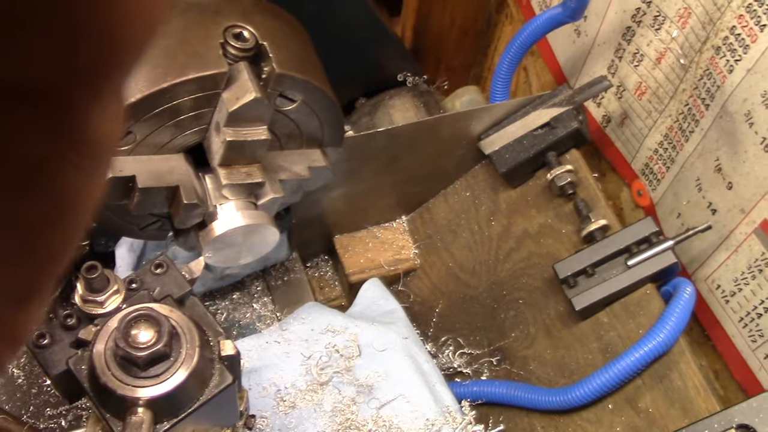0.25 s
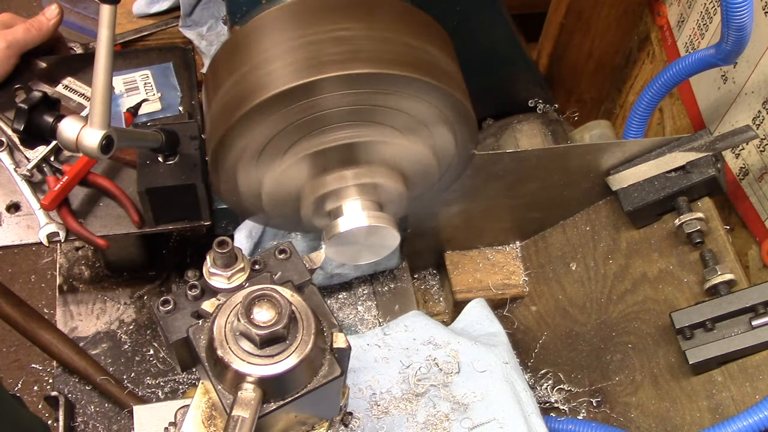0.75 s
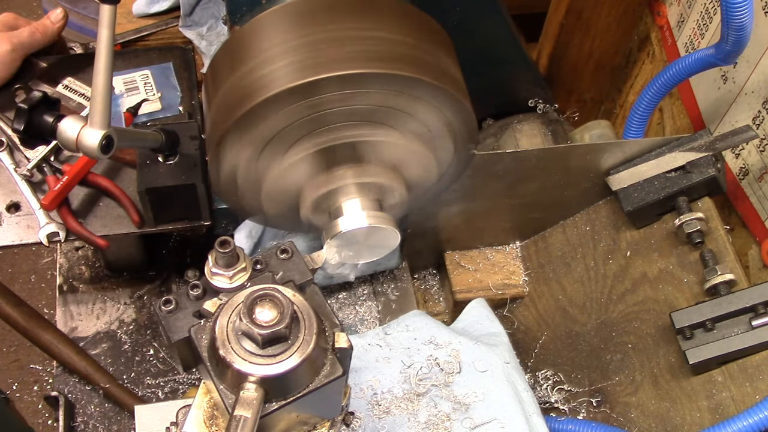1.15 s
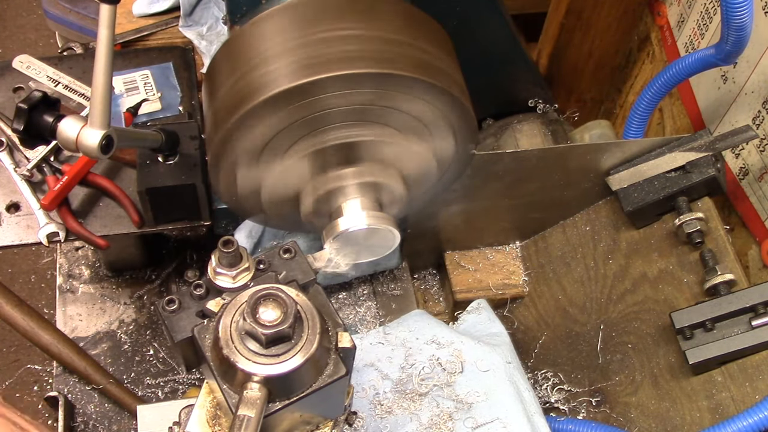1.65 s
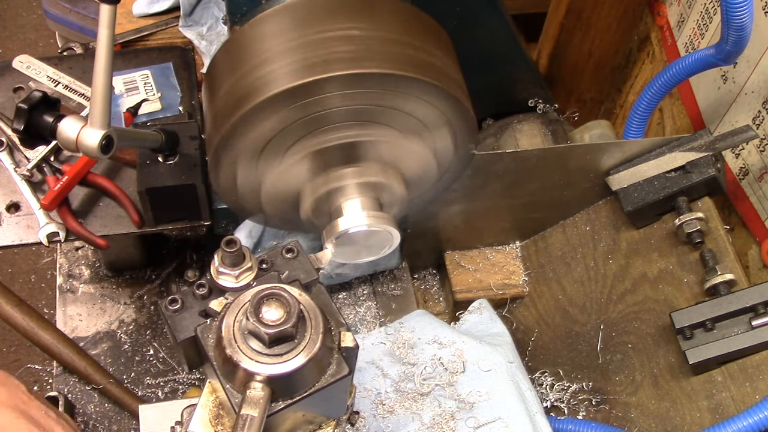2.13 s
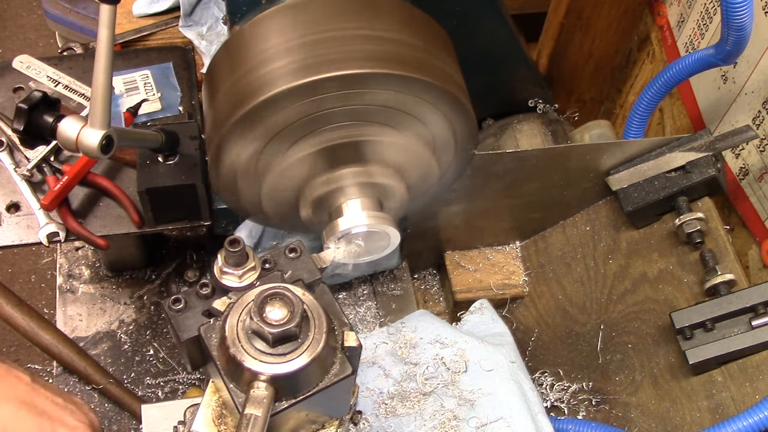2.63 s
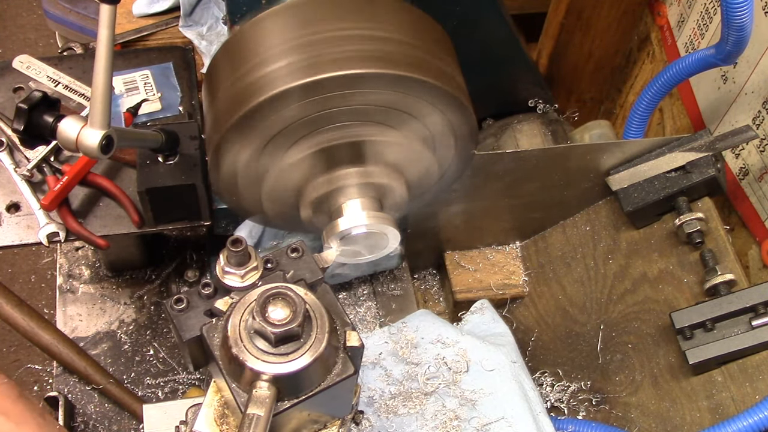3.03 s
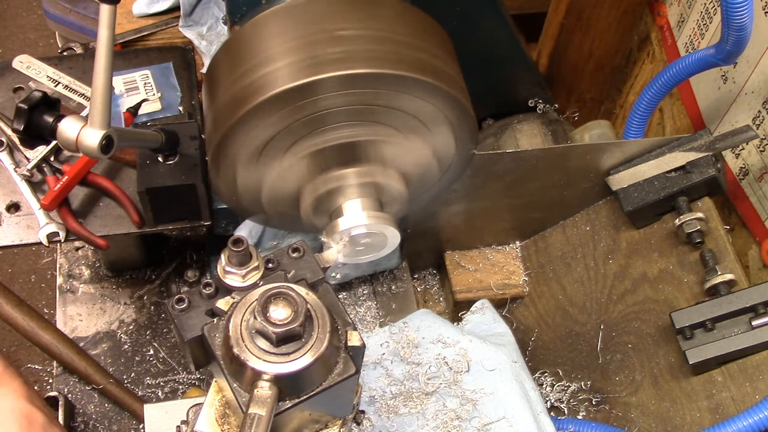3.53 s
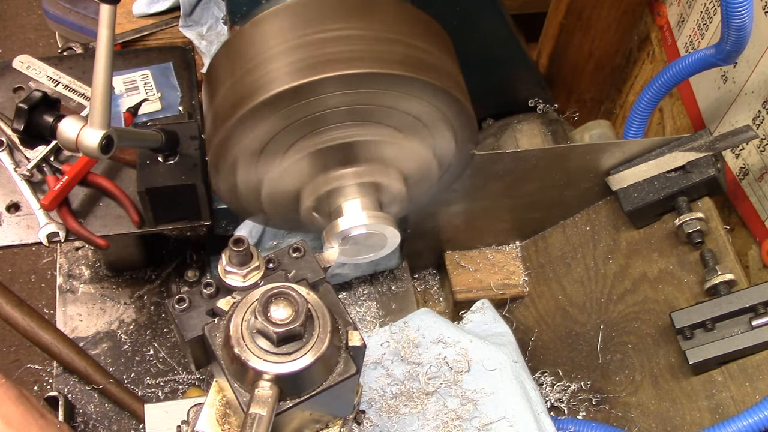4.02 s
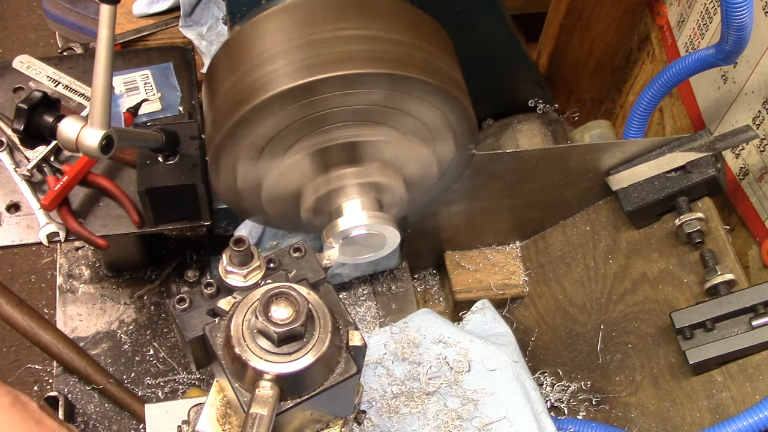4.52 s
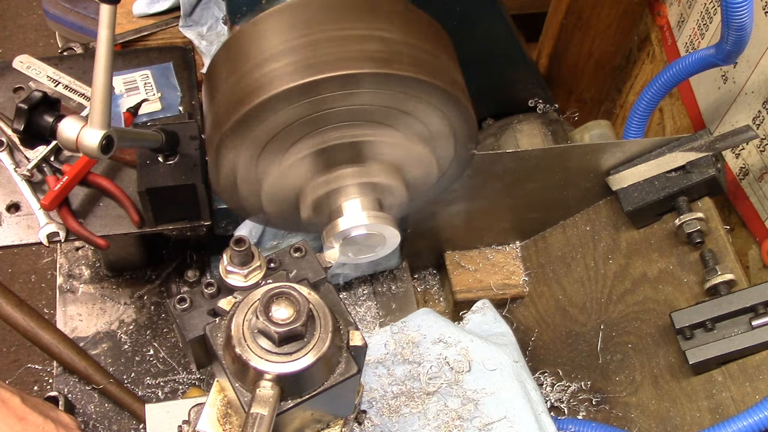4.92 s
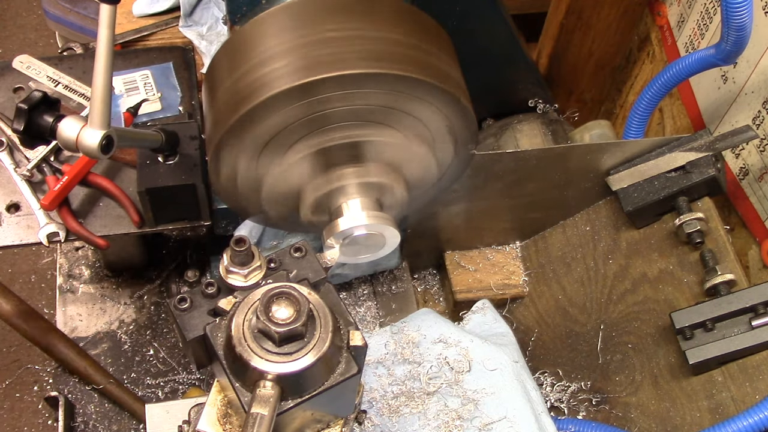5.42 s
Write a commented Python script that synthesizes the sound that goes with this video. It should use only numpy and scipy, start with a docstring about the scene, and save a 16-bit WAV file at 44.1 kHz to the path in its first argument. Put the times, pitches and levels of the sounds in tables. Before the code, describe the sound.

After a knock and dry clicks, a metal lathe whines and rumbles steadily while the scraping hiss of the cut grows.

```python
"""Small metal lathe, close up

A faint resonant workshop hiss and two knocks, then dry clicks and at once the machine at full speed:
gear lines, motor tones, casing rumble, a ringing headstock and the hiss of the tool on the work.
The running noise nearly repeats every 43 ms, and left and right slowly drift out of step.
At the very end the switch ticks, the motor tone drops away and one more knock lands on the bench."""
import sys
import numpy as np
from scipy import signal
from scipy.fft import rfft, irfft, next_fast_len
from scipy.io import wavfile
from scipy.ndimage import uniform_filter1d

SR = 44100
rng = np.random.default_rng(int(sys.argv[2]) if len(sys.argv) > 2 else 0)


def write(x):
    x = np.atleast_2d(x).T
    wavfile.write(sys.argv[1], SR, np.round(np.clip(x, -1, 1) * 32767).astype(np.int16))


N = 249853
T = np.arange(N) / SR
CYCLE = 1882  # samples until the running noise comes round again
START_S, STOP_S = .39, 5.585  # the running sound cuts in; the power goes off
FADE_IN_DB, FADE_IN_S, COAST_S = -3.5, .17, .011  # starting level; time constants of rise and fall
SIDES = np.array([[1], [-1]])  # left, right


def lathe():
    """The running machine: headstock, casing and gears hold steady under the hiss of the cut."""
    machine = steady(headstock() + casing() + gears())
    return undb(running_db(coast_db=-3.5)) * machine + undb(running_db(coast_db=0)) * tool_hiss()


# Tone colour of the headstock. Each row: frequency in Hz, relative level in dB.
HEADSTOCK_SPECTRUM = [(530, -41), (900, -24.5), (1070, -13.5), (1230, -6), (1260, -5.5), (1340, -2),
                      (1390, -9), (1550, -11), (1820, -15.5), (2600, -17.5), (2920, -17), (3180, -19.5),
                      (5000, -30), (6500, -43), (11000, -120)]
# Its peaks and notches. Each row: centre in Hz, width in Hz, lift in dB.
HEADSTOCK_RINGS = [(1216, 81, -3.5), (1556, 93, 3.5), (1750, 52, 1.5), (1963, 30, 9), (2846, 94, 4.5),
                   (3012, 45, 3.5), (3120, 60, -5.5)]


def headstock():
    """Midrange ringing noise that nearly repeats every 43 ms."""
    ring = coloured(recurring(slip_rad=1.091, uneven_db=.82), HEADSTOCK_SPECTRUM, HEADSTOCK_RINGS)
    return undb(-23.5 + .086 * walk(24)) * ring


# Tone colour of the casing. Each row: frequency in Hz, relative level in dB.
CASING_SPECTRUM = [(12, -60), (20, -27.5), (70, -25), (157, -17), (243, -7), (302, -11.5), (370, -6),
                   (592, -4), (643, -10.5), (711, -7.5), (774, -3.5), (841, -10.5), (1100, -8.5),
                   (1430, -44), (2420, -120)]
# Where the rumble is thin. Each row: centre in Hz, width in Hz, gain in dB.
CASING_NOTCHES = [(584, 130, -3.5), (870, 63, -1)]


def casing():
    """A low rumble that nearly repeats every 43 ms and throbs a little."""
    rumble = coloured(recurring(slip_rad=1.081, uneven_db=1.7), CASING_SPECTRUM, CASING_NOTCHES)
    return undb(-25.5 + .66 * walk(16)) * rumble


# The whine of gears and shafts. Each row: pitch in Hz, relative level in dB.
GEAR_LINES = [(195, -19), (235, -14), (258, -10), (353, -13), (379, -7), (420, -11), (447, -16), (467, -9),
              (560, -13), (591, -7), (609, -9), (682, -13), (753, -10), (915, -14), (1126, -12),
              (1142, -14), (1174, -12), (1195, -10), (1218, -11), (1295, -5), (1309, -1.2), (1333, -8),
              (1360, -11), (1380, -12), (1407, -14), (1433, -9), (1448, -12), (1505, -7), (1525, -6.5),
              (1572, -4.5), (1588, -11), (1711, -14), (1830, -19), (1969, -17), (2880, -17)]


def gears():
    """Gears and shafts sing as wavering sines, the high ones less steady."""
    whine = 0
    for hz, db in GEAR_LINES:
        flutter_db, waver_hz = (1.7, 2) if hz < 1000 else (2.6, 3)
        whine += undb(db + flutter_db * walk(32)) * tone(hz + waver_hz * walk(14))
    return undb(-30) * whine


# Tone colour of the cut. Each row: frequency in Hz, relative level in dB.
TOOL_SPECTRUM = [(2060, -61), (3500, -3.5), (3940, -6), (4940, -13), (5300, -2.5), (5700, -7.5),
                 (6260, -4.5), (7010, -8), (8450, -9), (9340, -13.5), (11700, -12.5), (12900, -19),
                 (13300, -11.5), (13800, -10), (14100, -24), (15600, -34)]
# Resonances of the tool. Each row: centre in Hz, width in Hz, lift in dB.
TOOL_RINGS = [(5350, 130, 7), (6190, 130, 5)]
# The hiss swells as the tool feeds in. Each row: time in seconds, level in dB.
TOOL_FEED = [(.45, -39.5), (.9, -40), (1.7, -37.5), (2.4, -36.5), (2.7, -35), (2.95, -34.5), (3.1, -32.5),
             (3.4, -32), (3.6, -32.5), (3.8, -33), (4.1, -33), (4.5, -32), (4.8, -32.5), (5.05, -31.5),
             (5.25, -33.5), (5.67, -34.5)]
# The tool lets go and grips again. Each row: start in seconds, dip in dB, recovery time in seconds.
TOOL_SLIPS = [(3.44, -3.5, .08), (3.615, -2, .08), (4.12, -3, .1), (4.39, -4.5, .03), (4.685, -5, .045),
              (5.055, -3, .12)]


def tool_hiss():
    """The tool scrapes the work, ringing more as it feeds in and dulling when it slips."""
    slip_db = sum(dip_db * since(s, regrip_s) for s, dip_db, regrip_s in TOOL_SLIPS)
    cut_db = curve(TOOL_FEED) + slip_db
    grit = undb(3.6 * uniform_filter1d(rng.exponential(1, N), size=4))  # chips breaking off
    scrape = grit * recurring(slip_rad=1.26, uneven_db=2.5)
    plain = coloured(scrape, TOOL_SPECTRUM)
    ringing = 1.123 * coloured(scrape, TOOL_SPECTRUM, TOOL_RINGS) - plain
    hiss = plain + undb(.7 * (cut_db - cut_db.max()) + 1.5 * walk(24)) * ringing
    body = signal.sosfiltfilt(signal.butter(3, 9000, fs=SR, output="sos"), hiss)
    sizzle = hiss - body
    # the sizzle fills in late, dips further on a slip and flickers
    sizzle_db = -.3 - 8 * since(START_S, .12) + .3 * slip_db + .5 * walk(13)
    return undb(cut_db + .76 * walk(14)) * (body + undb(sizzle_db) * sizzle)


# The rotor-slot tone sags a little and recovers. Each row: time in seconds, pitch in Hz.
SLOT_PITCH = [(.45, 652.6), (1.5, 650.7), (2.8, 651.2), (3.6, 652.2), (5.6, 652.8)]
# Its sidebands. Each row: steps of twice the mains above the slot tone, level against it in dB,
# late phase gap between left and right in radians.
SLOT_SIDEBANDS = [(1, -2.5, 3.3), (2, -9, .5)]


def motor(mains_hz=60, part_s=4.9):
    """Rotor slots whine over a magnetic hum; from part_s the sidebands spread in stereo."""
    slot_hz, hum_hz = curve(SLOT_PITCH), 2 * mains_hz
    parted = np.clip((T - part_s) / .13, 0, 1) * SIDES / 2
    whine = tone(slot_hz + .8 * walk(12)) * undb(1.5 * walk(14))
    for step, db, gap_rad in SLOT_SIDEBANDS:
        sideband = tone(slot_hz + step * hum_hz + .81 * walk(3.96), gap_rad * parted)
        whine = whine + undb(db + .58 * walk(11)) * sideband
    hum = undb(-52 + 1.7 * walk(5.3)) * tone(np.full(N, hum_hz))
    return undb(-32.5 + running_db(coast_db=-29)) * whine + hum


# Blows on the bench. Each row: start in seconds, level in dB, brightness in dB per octave.
BENCH_KNOCKS = [(0.101, -25.5, 1), (0.388, -19.5, 2), (5.629, -19.5, -5)]
# Modes of the bench. Each row: pitch in Hz, relative level in dB, seconds to fade by 60 dB.
BENCH_MODES = [(461, -7, 0.14), (794, -4.5, 0.04), (1136, -8, 0.051), (1510, 9.5, 0.018), (2700, -15, .03),
               (3950, -26, 0.027)]


def knocks():
    """Short blows ring the bench; harder contact lifts the upper modes."""
    out, t = np.zeros(N + SR), np.arange(SR // 8) / SR
    attack = 1 - np.exp(-t / .001)
    for s, db, tilt_db in BENCH_KNOCKS:
        ring = sum(undb(mode_db + tilt_db * np.log2(hz / 1000)) * ping(t, hz, t60, rng.random())
                   for hz, mode_db, t60 in BENCH_MODES)
        out[int(s * SR):][:len(t)] += undb(db) * ring * attack
    return out[:N]


# Dry clicks at the start, one cycle apart. Each row: level in dB, half width in milliseconds.
START_CLICKS = [(-2.5, .018), (-1.5, .14), (-12, .08), (-21, .06)]


def clicks(first_s=.3998):
    """Pointed spikes that rise and fall alike, high-passed so they carry no thump."""
    out, ms = np.zeros(N), np.arange(-40, 160) * 1000 / SR
    for k, (db, width_ms) in enumerate(START_CLICKS):
        out[int(first_s * SR) + k * CYCLE - 40:][:len(ms)] += undb(db) * np.exp(-abs(ms) / width_ms)
    return signal.sosfilt(signal.butter(1, 250, "high", fs=SR, output="sos"), out)


def switch_tick():
    """The switch rings briefly as it cuts the power."""
    t = np.maximum(T - (STOP_S - .003), 0)
    attack = 1 - np.exp(-t / .002)
    return undb(-18.5) * ping(t, hz=2400, t60=.03) * attack


def scuff(start_s=.334, decay_s=.012):
    """A brief dry rub of midrange noise just before the running sound cuts in."""
    band = signal.butter(1, [700, 1400], "band", fs=SR, output="sos")
    rub = signal.sosfilt(band, 2.9 * rng.standard_normal(N))
    attack = np.clip((T - start_s) / .0015, 0, 1)
    return undb(-29) * rub * attack * since(start_s, decay_s)


# Tone colour of the quiet workshop. Each row: frequency in Hz, relative level in dB.
WORKSHOP_SPECTRUM = [(15, -69), (25, -39), (45, -14), (95, -8), (118, -1.5), (202, -8), (856, -6.5),
                     (1960, -14.5), (2300, -12), (3010, -18.5), (3350, -23), (3830, -20.5), (15000, -47)]
# Its hollow resonances. Each row: centre in Hz, width in Hz, lift in dB.
WORKSHOP_RINGS = [(420, 140, 4), (834, 28, 9.5), (1546, 84, 12.5), (2380, 190, 10), (3360, 120, 14),
                  (4640, 50, 7), (5130, 130, 9)]


def workshop(fade_db_per_s=9):
    """A faint hiss with tube-like resonances, sinking until the running sound cuts in."""
    hiss = coloured(rng.standard_normal(N), WORKSHOP_SPECTRUM, WORKSHOP_RINGS)
    return undb(-37 - fade_db_per_s * np.minimum(T, START_S)) * hiss


# How left and right part. Each row: frequency in Hz, widest slow phase gap in radians, seconds until
# it closes, seconds the sides hold together before trembling, tremble in radians.
STEREO_PARTING = [(60, 1.5, 8, 1.3, 1.6), (250, 1.6, 8, 1.1, 1.1), (700, 1.8, 8, .9, 1.3),
                  (1000, 2, 5.2, .35, 1.9), (1600, 2.2, 5.2, .25, 1.8), (2500, 2, 5.2, .1, 2.1),
                  (5000, 2, 5.2, .06, 2.3)]
# The strongest lines drift their own way. Each row: centre in Hz, half width in Hz, then the lead of
# the left side in radians at each of the times that DRIFT_TIMES lists in seconds.
LINE_DRIFTS = [(195, 14, 0, 1.1, .7, .7), (235, 11, 0, 1.1, 3, 6.3), (258, 11, .1, .6, 1.8, 2.8),
               (353, 12, .5, .4, -1.6, -2.4), (379, 12, 0, -.1, -1.7, -1.1), (420, 14, 0, -1.5, -3.7, -6.1),
               (467, 14, .2, -.7, -1, -.4), (560, 14, -.2, .4, .6, -2.4), (600, 20, .3, 2.3, 2.9, 2.8),
               (771, 20, .6, .4, -1, -2), (892, 14, .1, .2, .1, -1.3), (1312, 32, -1.8, 2.4, 5, 7.8),
               (1515, 22, -.1, -3, -4.4, -.6), (1580, 20, .1, -1.3, 1.8, 6.3),
               (1965, 24, 1.6, 7.4, 11, 14.4), (2870, 45, -2, -1.6, -4.1, -4.5),
               (3015, 25, 3.1, 1.1, 2.1, .2)]
DRIFT_TIMES = [1, 2.4, 3.8, 5.2]


def drift_apart(x, start_s=.34):
    """Mono to stereo: each line's phase parts, wanders and trembles, sooner in the treble."""
    frames = dict(fs=SR, nperseg=2 * CYCLE, noverlap=3 * CYCLE // 2)
    hz, s, spectra = signal.stft(x, **frames)
    row_hz, *columns = np.transpose(STEREO_PARTING)
    gap, close_s, hold_s, shake = (np.interp(hz, row_hz, c)[:, None] for c in columns)
    line = (np.arange(len(hz)) + 1) // 2  # two bins to each multiple of the cycle rate
    wander, tremble = rng.standard_normal((2, line[-1] + 1, len(s)))[:, line]
    # neighbouring lines mostly part the same way
    way = np.sign(uniform_filter1d(rng.standard_normal(line[-1] + 1), size=3))[line, None]
    elapsed = np.maximum(s - start_s, 0)
    lead = way * gap * np.sin(np.pi * elapsed / close_s) ** 2
    lead += np.cumsum(wander * (s > start_s), axis=1) * np.sqrt(s[1] / (4 * hold_s))
    for centre, half_width, *path in LINE_DRIFTS:
        lead[abs(hz - centre) < half_width] = np.interp(s, [start_s, *DRIFT_TIMES], [0, *path])
    lead += shake * uniform_filter1d(tremble, size=2, axis=1) * (1 - np.exp(-elapsed / hold_s))
    return np.array([signal.istft(spectra * np.exp(.5j * side * lead), **frames)[1][:N]
                     for side in (1, -1)])


def recurring(slip_rad, uneven_db):
    """Noise that nearly repeats: lines at multiples of the cycle rate slip in phase and vary in size."""
    count = N // CYCLE + 2
    offset, start = rng.standard_normal((2, CYCLE // 2 + 1, 1))
    step, size = rng.standard_normal((2, CYCLE // 2 + 1, count))
    phase = 9 * start + np.cumsum(.7 * offset + slip_rad * step, axis=1)
    lines = undb(uneven_db * size) * np.exp(1j * phase)
    cycles = np.tile(irfft(lines.T, CYCLE), 2) * np.hanning(2 * CYCLE)
    return (cycles[1:, :CYCLE] + cycles[:-1, CYCLE:]).ravel()[:N]  # each cycle fades into the next


def coloured(x, spectrum, rings=()):
    """Shape x by a spectrum with peaks and notches; rms 1."""
    size = next_fast_len(N)
    hz = np.maximum(np.arange(size // 2 + 1) * SR / size, 1)
    point_hz, point_db = np.transpose(spectrum)
    db = np.interp(np.log(hz), np.log(point_hz), point_db, left=-120, right=-120)
    for centre, width, lift_db in rings:
        db += lift_db / (1 + (2 * (hz - centre) / width) ** 2)
    shaped = irfft(rfft(x, size) * undb(db), size)[:N]
    return shaped / shaped.std()


def steady(x):
    """Even out the slow swells of each narrow band; the quick flutter stays."""
    spectra = signal.stft(x, SR, nperseg=CYCLE)[2]
    power = uniform_filter1d(abs(spectra) ** 2, size=3, axis=0) + 1e-18
    swell = uniform_filter1d(power, size=6, axis=1) / power.mean(axis=1, keepdims=True)
    return signal.istft(spectra / np.sqrt(swell), SR, nperseg=CYCLE)[1][:N]


def running_db(coast_db):
    """The level quickly fills in as the running sound cuts in, and sinks to coast_db after power off."""
    return FADE_IN_DB * since(START_S, FADE_IN_S) + coast_db * ((T >= STOP_S) - since(STOP_S, COAST_S))


def tone(hz, shift_rad=0):
    """Sine of rms 1 that follows a pitch curve."""
    return np.sqrt(2) * np.sin(2 * np.pi * (np.cumsum(hz) / SR + rng.random()) + shift_rad)


def ping(t, hz, t60, turns=0):
    """One struck mode: a sine that fades by 60 dB in t60 seconds."""
    return np.sin(2 * np.pi * (hz * t + turns)) * np.exp(-np.log(1000) * t / t60)


def walk(rate):
    """Smooth random wobble with rate new values a second; spread near 1."""
    hold = int(SR / rate)
    steps = np.repeat(rng.standard_normal(N // hold + 1), hold)
    return 1.187 * uniform_filter1d(uniform_filter1d(steps, hold), hold)[:N]


def since(s, tau):
    """Zero before s, one at s, then dying away with time constant tau."""
    return (T >= s) * np.exp(-np.maximum(T - s, 0) / tau)


def curve(table):
    """Glide through timed points, one value a sample."""
    return np.interp(T, *np.transpose(table))


def undb(db):
    """Decibels to gain."""
    return 10 ** (np.asarray(db) / 20)


def scene():
    """The machine takes over from the workshop hiss in 30 ms, a touch louder on the right."""
    on = np.clip((T - START_S) / .03, 0, 1)
    room = undb(-16.5) * workshop() * SIDES + workshop()  # almost the same on both sides
    machine = undb(-.125 * SIDES) * (drift_apart(on * lathe()) + on * motor())
    return machine + knocks() + clicks() + switch_tick() + scuff() + (1 - on) * room


def record(dry, top_hz=15700):
    """The recorder cuts the top steeply."""
    return signal.sosfilt(signal.ellip(8, .2, 80, top_hz, fs=SR, output="sos"), dry)


dry = scene()
out = record(dry)
write(out)
```